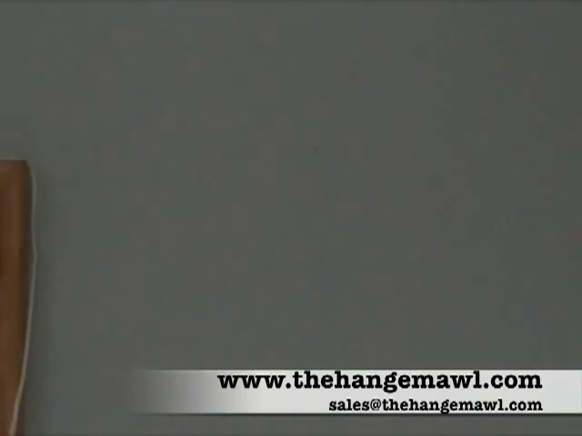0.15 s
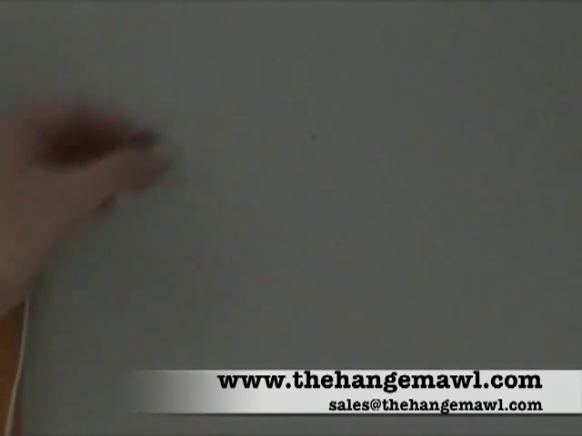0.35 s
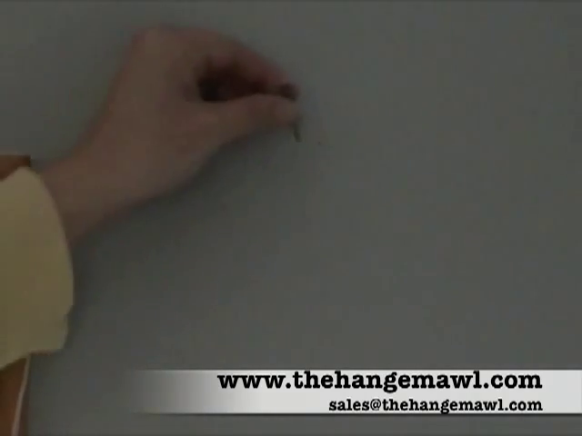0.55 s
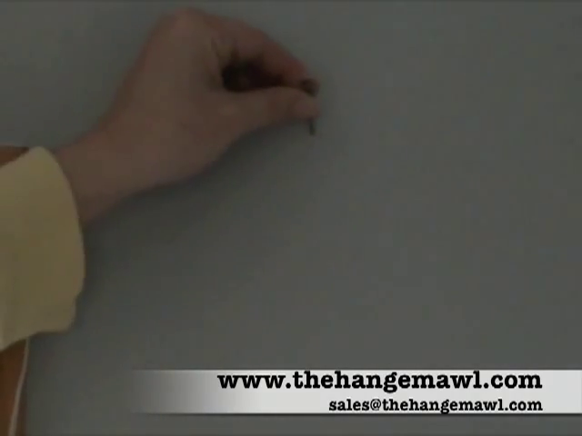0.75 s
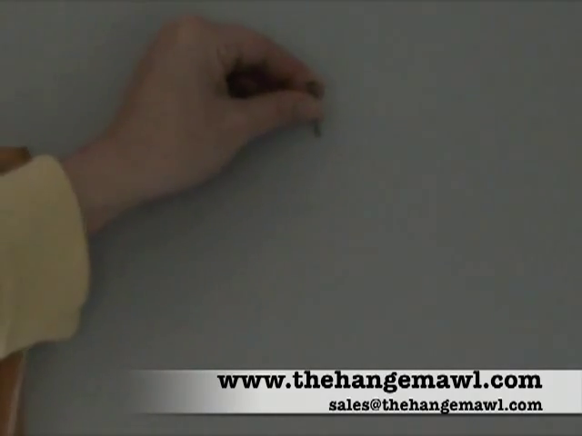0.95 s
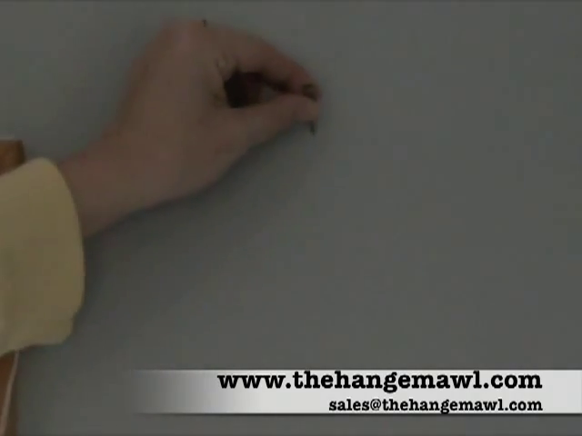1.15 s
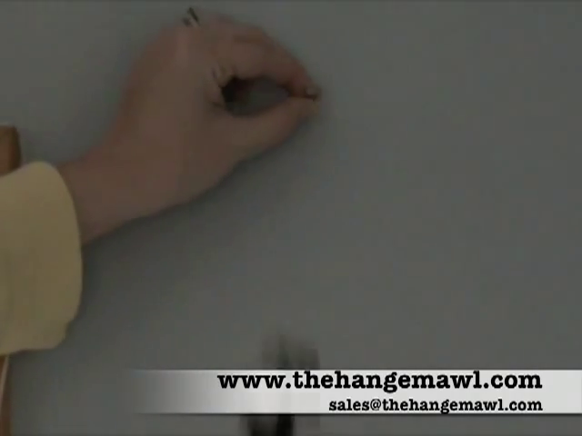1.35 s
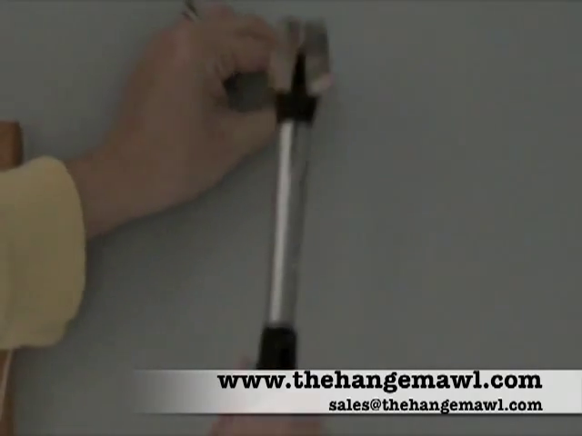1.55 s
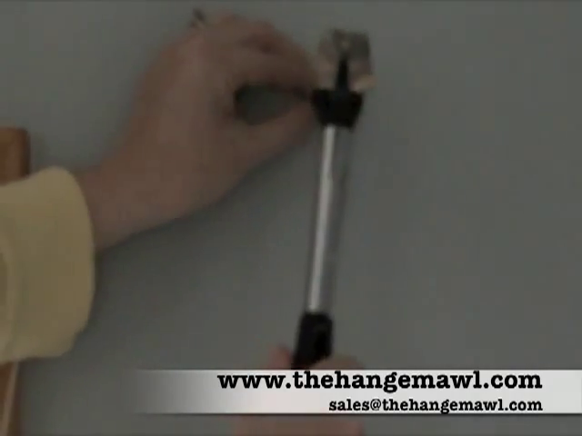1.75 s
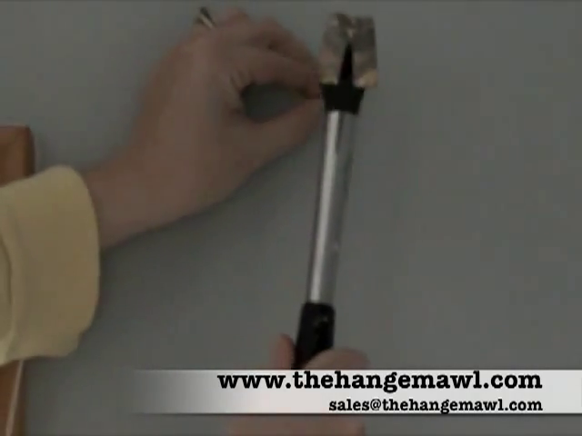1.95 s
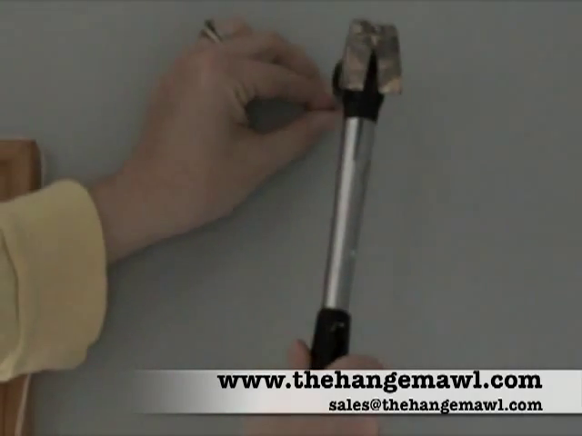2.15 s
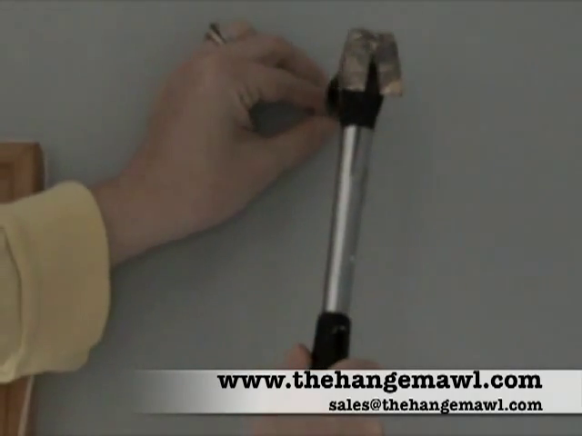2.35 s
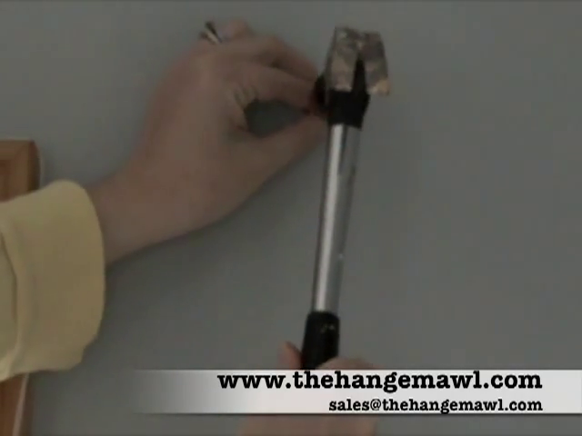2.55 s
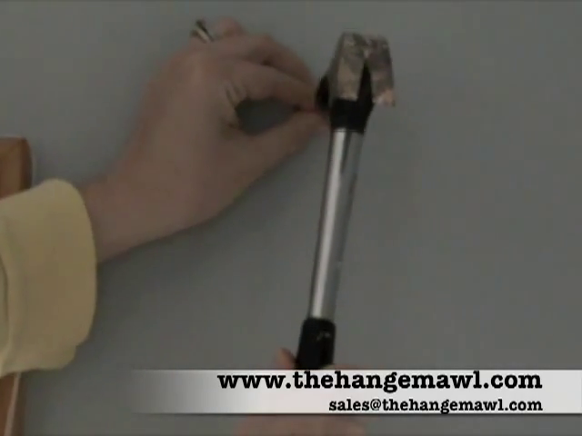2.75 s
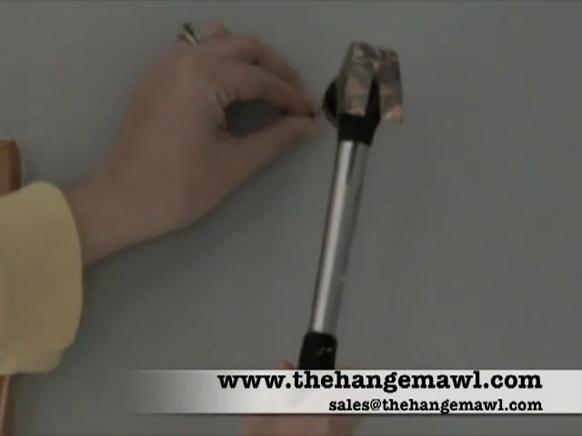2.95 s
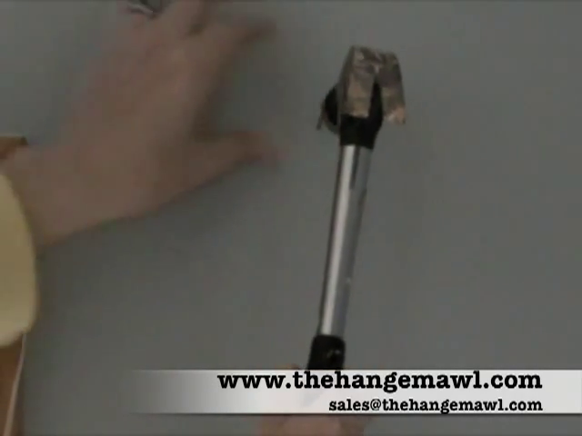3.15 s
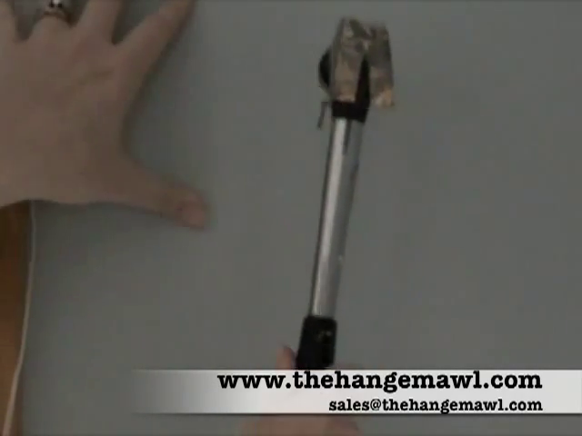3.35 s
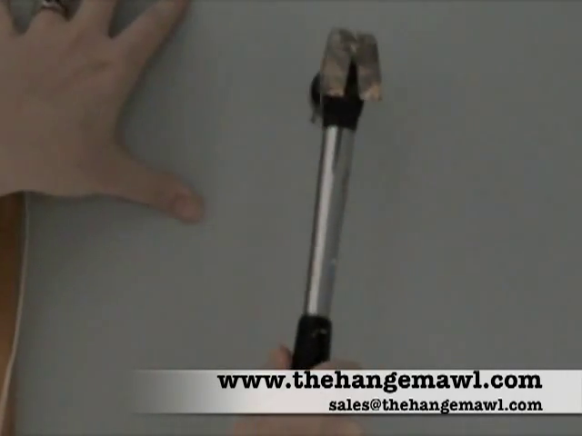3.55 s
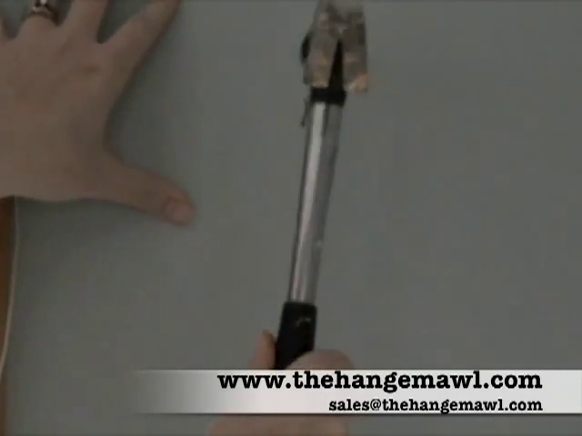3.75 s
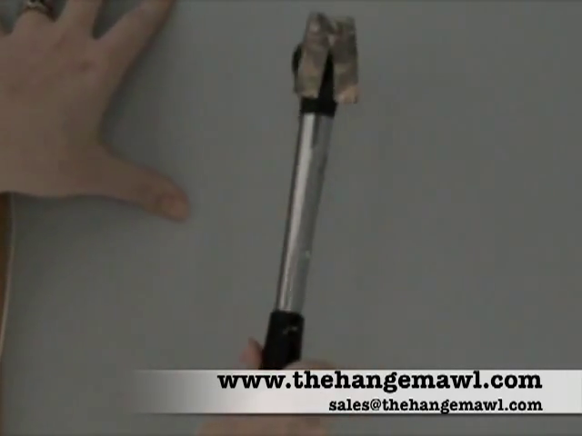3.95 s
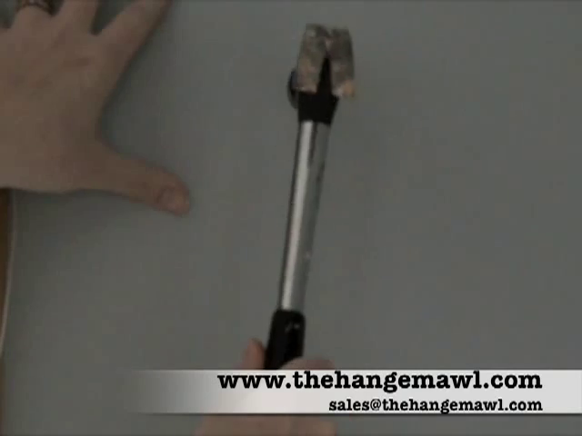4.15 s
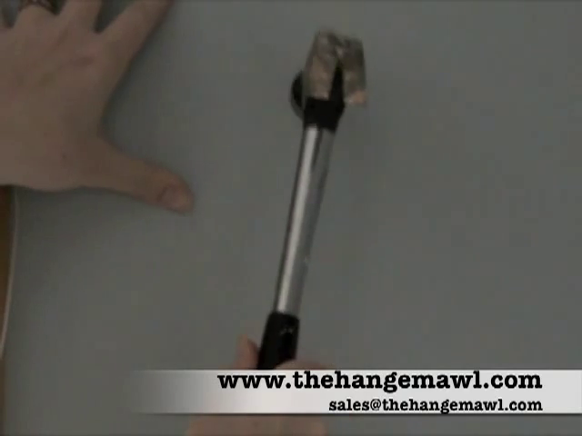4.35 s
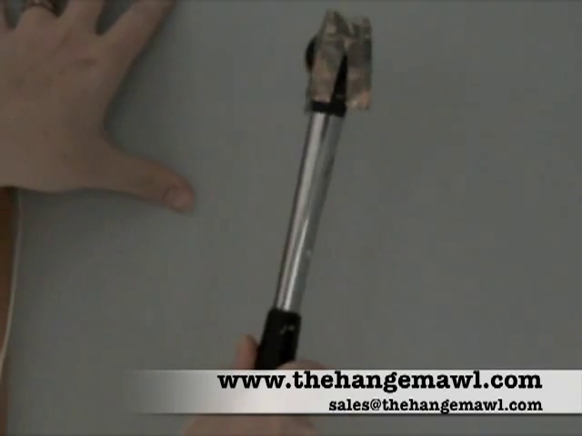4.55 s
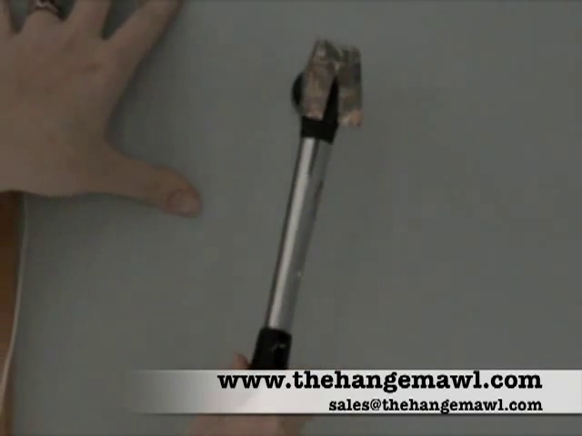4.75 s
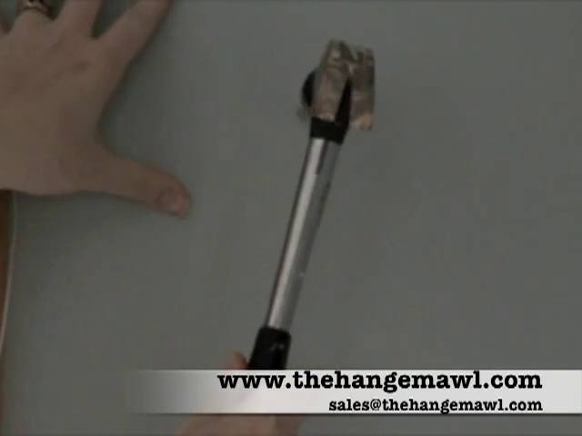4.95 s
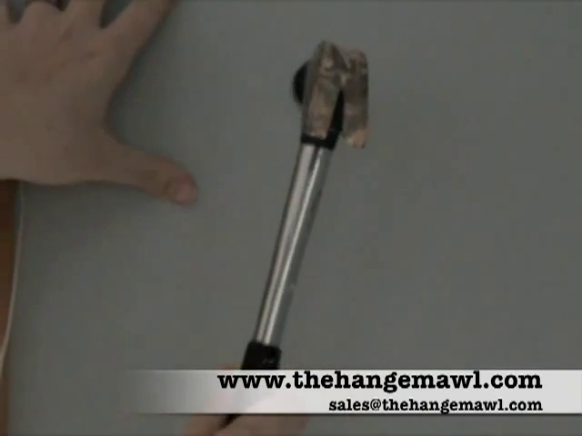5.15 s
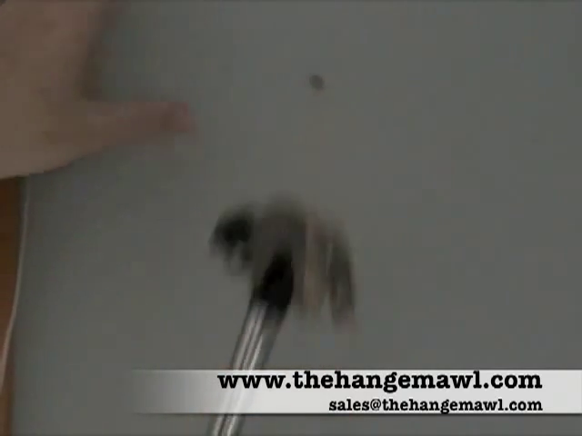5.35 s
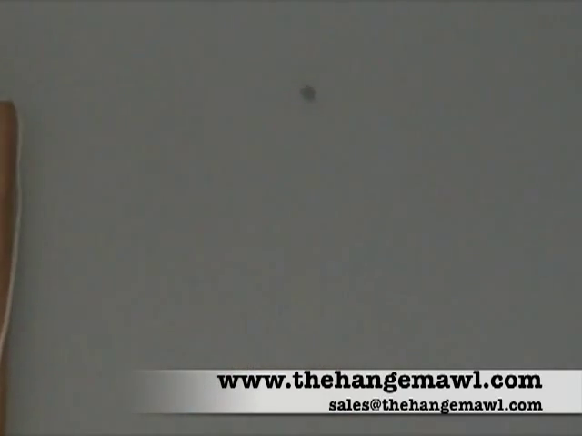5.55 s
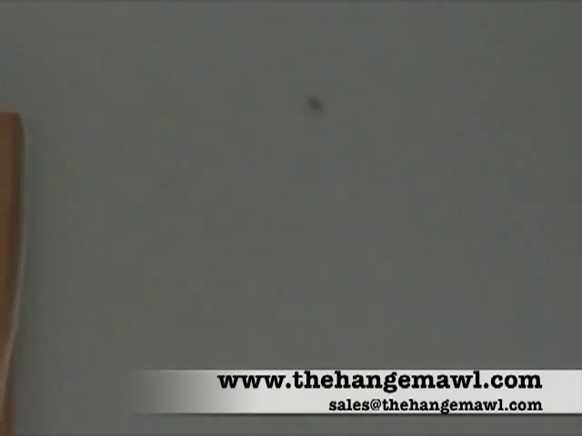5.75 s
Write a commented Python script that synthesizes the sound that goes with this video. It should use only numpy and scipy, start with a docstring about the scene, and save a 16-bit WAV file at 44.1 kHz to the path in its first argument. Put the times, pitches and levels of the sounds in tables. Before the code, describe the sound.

A hammer taps a nail once, then drives it into a hollow wall in two quick runs of blows in a bare room.

```python
"""Hammering a nail into a hollow wall

A nail is set with one tap, then hammered into a plasterboard wall in two runs of blows, close to a camera.
Filtered clicks, noise bursts and decaying tones make each blow; its thud weakens and its crack brightens.
A bare room answers with fading noise, and gain control clamps on loud cracks, so the room swells up behind.
Handling knocks (short resonances) and a sleeve's rustle (shaped noise) come before and after,
with a faint squeak (falling tone) near the end, all over steady hiss and a whine of narrow noise bands."""
import sys
import numpy as np
from scipy import signal
from scipy.fft import rfft, irfft
from scipy.io import wavfile
from scipy.ndimage import uniform_filter1d, minimum_filter1d

SR = 44100
rng = np.random.default_rng(int(sys.argv[2]) if len(sys.argv) > 2 else 0)


def to_wav(sig):
    """Store sig (one row per channel, or 1-D mono) as 16-bit WAV at the path in sys.argv[1].

    Samples outside -1..1 are clipped; the rate is SR.
    """
    pcm = np.clip(np.atleast_2d(sig), -1, 1) * 32767
    pcm = np.round(pcm).astype(np.int16)
    wavfile.write(sys.argv[1], SR, pcm.T)  # frames by channels


N = 255339
TIME = np.arange(N) / SR  # seconds
RING = 2 ** 15  # longest length of one short sound, in samples
AGE = np.arange(RING) / SR  # seconds since a short sound began
RING_HZ = np.fft.rfftfreq(RING, 1 / SR)

# How wide the room sounds. Each row: frequency in Hz, side level over middle level in dB.
ROOM_WIDTH = [(60, -8.5), (200, -5), (380, 2), (700, -5.5), (1300, -4.5), (2400, -10), (4400, -13),
              (8000, -23), (15000, -10)]
# How wide the still room's hiss and whine sound. Each row: frequency in Hz, side level over middle in dB.
HUSH_WIDTH = [(60, -29), (240, -17), (950, 0.5), (3770, 1.5), (15000, -10.5)]


def amp(db):
    """Turns decibels into gain."""
    return 10 ** (np.asarray(db) / 20)


def unit(x):
    """Scales a sound to an energy of one a channel, averaged over the channels."""
    energy = np.mean(np.sum(x ** 2, -1))
    return x / np.sqrt(energy + 1e-30)


def read(points, hz):
    """Reads a curve that joins (Hz, value) points on a log-frequency axis."""
    f, value = np.transpose(points)
    return np.interp(np.log(hz + 1), np.log(f + 1), value)


def add(mix, s, sound):
    """Mixes a short stereo sound in at s seconds."""
    start = max(round(s * SR), 0)
    part = mix[:, start:][:, :RING]
    part += sound[:, :part.shape[1]]


def colour(x, db):
    """Filters with the dB gains given at RING_HZ; nothing sounds before its cause (minimum phase)."""
    log_gain = np.log(amp(np.r_[db, db[-2:0:-1]]))
    response = np.exp(np.conj(signal.hilbert(log_gain)))[:len(db)]
    impulse = irfft(response)[None, :RING // 4]
    return signal.fftconvolve(np.atleast_2d(x), impulse, axes=1)[:, :RING]


def stereo_noise(size, width):
    """Makes two channels of white noise, as alike as the side level allows."""
    side = amp(read(width, np.fft.rfftfreq(size, 1 / SR)))
    m, s = rfft(rng.standard_normal((2, size)))
    left_right = np.array([m + side * s, m - side * s])
    return irfft(left_right / np.hypot(1, side), size)


def shaken(t60):
    """A burst of dense vibration that falls 60 dB in t60 seconds."""
    return unit(stereo_noise(RING, ROOM_WIDTH) * amp(-60 * AGE / t60))


def hiss(spectrum, width):
    """Steady coloured stereo noise with an rms of one."""
    gain = amp(read(spectrum, np.fft.rfftfreq(N, 1 / SR)))
    noise = irfft(rfft(stereo_noise(N, width)) * gain, N)
    return unit(noise) * np.sqrt(N)


def hum(width_hz=9):
    """A faint whine of wavering tones, each a very narrow band of noise."""
    # Each row: pitch in Hz, level in dB.
    whine = [(268, -68), (835, -68), (3300, -75.5), (5800, -79)]
    hz = np.fft.rfftfreq(N, 1 / SR)
    lines = 0
    for pitch, db in whine:
        lines = lines + amp(db) * unit(1 / (1 + ((hz - pitch) / width_hz) ** 2))
    return irfft(rfft(stereo_noise(N, HUSH_WIDTH)) * lines, N) * np.sqrt(len(hz))


def room_tail(start_s=0.0044, build_s=0.015, count=26):
    """Dense echoes of the room: noise that builds up briefly, each band dying away at its own speed."""
    # How long echoes last. Each row: frequency in Hz, time to fall 60 dB in seconds.
    echo_life = [(40, 1), (100, 0.35), (300, 0.39), (1000, 0.48), (3000, 0.47), (7000, .37), (14000, 0.27)]
    noise = rfft(stereo_noise(RING, ROOM_WIDTH))
    centres = np.geomspace(40, 16000, count)
    onset = np.clip((AGE - start_s) / build_s, 0, 1)
    tail = 0
    for hz, pick in zip(centres, np.eye(count)):
        band = np.sqrt(read(np.c_[centres, pick], RING_HZ))
        fade = onset * amp(-60 * AGE / read(echo_life, hz))
        # each band keeps its share of the energy, however fast it fades
        tail = tail + unit(irfft(noise * band) * fade) * np.linalg.norm(band)
    return unit(tail)


def sleeve(grain_db=1.4, pivot_hz=2000, swish_t60=0.79):
    """Each arm move is a noise swish that swells and dies; the cloth slides in small uneven catches."""
    # Each row: start in seconds, rise in seconds, swell's top level in dB, brightness in dB per octave.
    swishes = [(0, 0.0085, -51, -1), (.045, 0.0092, -50, 1.3), (.28, 0.061, -51, 0.6),
               (.45, .035, -52.5, 0.7), (.905, 0.0093, -56.5, -2.5), (1.09, 0.053, -60.5, -0.5),
               (5.53, 0.039, -52.5, 0.5), (5.64, .03, -58, 1)]
    # Basic tone of the cloth. Each row: frequency in Hz, relative level in dB per Hz.
    cloth_tone = [(100, 3), (500, -3.5), (1400, -1.5), (3000, -7), (8000, -12.5), (12000, -26),
                  (16000, -27)]
    out = np.zeros((2, N))
    octaves = np.log2(np.maximum(RING_HZ, 100) / pivot_hz)
    for s, rise, db, bright in swishes:
        tone = amp(read(cloth_tone, RING_HZ) + bright * octaves)
        cloth = irfft(rfft(stereo_noise(RING, ROOM_WIDTH)) * tone)
        fade = amp(db - 60 * np.maximum(AGE - rise, 0) / swish_t60)
        swell = np.minimum(AGE / rise, 1) * fade
        add(out, s, unit(cloth) * np.sqrt(RING) * swell)
    catches = unit(uniform_filter1d(rng.standard_normal(N), size=300)) * np.sqrt(N)
    return out * amp(grain_db * catches)


def squeak(tail, start_hz=560, sag_hz_per_s=730, rise_s=0.005, slip_t60=0.15, room_db=-6):
    """A faint squeak in two slips as the hands draw back; its pitch falls as the hand slows."""
    # Each row: start in seconds, level in dB that the slip dies away from.
    slips = [(5.531, -40.5), (5.579, -45.5)]
    level = 0
    for s, db in slips:
        rise = np.clip((TIME - s) / rise_s, 0, 1)
        level = level + rise * amp(db - 60 * abs(TIME - s) / slip_t60)
    hz = start_hz - sag_hz_per_s * (TIME - slips[0][0])
    tone = level * np.sin(2 * np.pi * np.cumsum(hz) / SR)
    return tone + amp(room_db) * signal.fftconvolve(tone[None], tail, axes=1)[:, :N]


def bump(tail, hz, width_hz, room_db, rattle_db=7, rattle_t60=0.044):
    """A click and a rattle through one broad resonance, dulled by soft contact, with the room's answer."""
    detune = (RING_HZ ** 2 - hz ** 2) / ((RING_HZ + 1) * width_hz)
    dulling = 1 + (RING_HZ / (hz + width_hz)) ** 4
    shape = -10 * np.log10((1 + detune ** 2) * dulling)
    shape = np.maximum(shape, -100)
    push = signal.unit_impulse(RING) + amp(rattle_db) * shaken(rattle_t60)
    direct = unit(colour(push, shape))
    return direct + amp(room_db) * unit(colour(tail, shape))


def knocks(tail, contact_room_db=-1, hollow_room_db=1.5, thump_room_db=-4):
    """Soft bumps on wall and furniture: contact and hollow knock first, then the wall's slow, low flex."""
    # Each row: start in seconds, contact level in dB, contact pitch in Hz, width of its resonance in Hz,
    # hollow knock level in dB, wall thump level in dB.
    bumps = [(0.0475, -33.5, 700, 1370, -32.5, -20), (.070, -32, 520, 220, -40, -40),
             (.128, -29, 690, 460, -27, -45), (.460, -58, 350, 250, -44, -36),
             (.536, -44.5, 720, 650, -48, -39), (.687, -40.5, 574, 110.3, -58, -62),
             (5.498, -49.5, 620, 400, -64, -65), (5.738, -52, 870, 800, -62, -60),
             (5.771, -49, 900, 800, -58, -60)]
    hollow_hz, hollow_width_hz = 293, 355  # the cavity's dull knock
    thump_hz, thump_width_hz, thump_lag_s = 60, 30, 0.0035
    out = np.zeros((2, N))
    for s, db, hz, width_hz, hollow_db, thump_db in bumps:
        add(out, s, amp(db) * bump(tail, hz, width_hz, contact_room_db))
        add(out, s, amp(hollow_db) * bump(tail, hollow_hz, hollow_width_hz, hollow_room_db))
        add(out, s + thump_lag_s, amp(thump_db) * bump(tail, thump_hz, thump_width_hz, thump_room_db))
    return out


def low_modes(build_s=0.004):
    """Standing waves in cavity and room: they build up, and reach the two microphones out of step."""
    # Each row: pitch in Hz, relative level in dB, time to fall 60 dB in seconds.
    standing_waves = [(36.6, -17, 1.13), (78.4, -2, 0.31), (135.3, -11, 0.25), (209.3, -2.5, 0.39),
                      (224, -6, 0.21), (262.5, -12, 0.6), (313.7, -4, 0.39), (420.4, -6, 0.37),
                      (483, -6.5, 0.41), (530, -6, 0.38), (688, -29.5, 0.13), (770, -30, 0.13),
                      (1670, -15, 0.52)]
    ring = 0
    for hz, db, t60 in standing_waves:
        first, gap = rng.random(2)
        cycles = hz * AGE + first + np.array([[0], [gap / 3]])
        ring = ring + amp(db - 60 * AGE / t60) * np.sin(2 * np.pi * cycles)
    return unit(ring * (1 - np.exp(-AGE / build_s)))


def wall_strike(bend_lag_s=0.00109, left_lag_s=0.0027, crunch_db=4, crunch_t60=0.0081,
                shiver_db=-5, shiver_t60=0.18, ring_db=0, contact_s=0.0001):
    """Bending waves bring the treble first and the bass late; plaster crunches, board and nail ring briefly."""
    # Tone of the wall's direct sound. Each row: frequency in Hz, relative level in dB per Hz.
    board_tone = [(25, -30), (65, -0.5), (125, 8), (250, 0.5), (370, -8), (510, -2.5), (780, -11.5),
                  (1400, -10.5), (1850, -12), (2700, -15), (4200, -18.5), (5700, -26.5), (8500, -24.5),
                  (11000, -38), (16000, -55)]
    # What the struck spot rings with, from the board's flex up to the nail.
    # Each row: pitch in Hz, relative level in dB, time to fall 60 dB in seconds.
    struck_spot = [(68, -25, 0.037), (144.7, 4.5, 0.082), (463, 0, 0.013), (1133, -13.5, 0.032),
                   (2030, -6, .022), (3385, -7, 0.03), (4280, -5.5, 0.02), (8340, -14.5, 0.012)]
    delay = bend_lag_s / np.sqrt(np.maximum(RING_HZ, 60) / 1000)  # bend_lag_s is the delay at 1 kHz
    turns = np.cumsum(delay) * SR / RING  # summing the delay over frequency gives the phase
    front = -irfft(np.exp(-2j * np.pi * turns)) * (AGE < .5)
    plaster = amp(crunch_db) * shaken(crunch_t60) + amp(shiver_db) * shaken(shiver_t60)
    plaster = colour(plaster, read([(120, -1), (400, 7.0)], RING_HZ))
    ring = 0
    for hz, db, t60 in struck_spot:
        # only the bass, which leaves the whole board, reaches the left microphone late
        lag = np.array([[left_lag_s], [0]]) / (1 + (hz / 300) ** 2)
        age = np.maximum(AGE - lag, 0)
        push = 1 - np.exp(-age / contact_s)  # the hammer face takes a moment to load the nail
        ring = ring - push * amp(db - 60 * age / t60) * np.sin(2 * np.pi * hz * age)
    wall = unit(colour(front + plaster, read(board_tone, RING_HZ)))
    return unit(wall + amp(ring_db) * unit(ring))


def hammer(tail, room_db=-5, modes_db=-11.5, shift_rad=1.365, far_thud=0.84):
    """Every blow wakes the same wall and room; the echo pattern shifts slowly as the nail sinks."""
    # Each row: start in seconds, force in dB, then tone changes in dB for the board's thud,
    # the cavity's knock, the crack and the nail's tick.
    blows = [(2.0937, -13, 11, 2, -8.5, 2.5), (2.3658, 7.5, -0.5, 0.5, -10, -5.5),
             (2.6169, 8.5, -3, -3, -8.5, -9.5), (2.861, 10, -3.5, -4, -9, -8.5),
             (3.606, 9.5, 1, -2, -2, -4.5), (3.9009, 10, -3.5, -2.5, -1.5, -2.5),
             (4.1742, 6.5, -2, -1, 0, 0.5), (4.4481, 4, -4, 1.5, 0, 1), (4.7251, -1.5, -6, -0.5, 0.5, 2.5)]
    # First reflections. Each row: delay in seconds, level in dB.
    echoes = [(.0095, -11), (0.0161, -12), (0.0238, -32), (0.0265, -21), (.033, -18)]
    # What small nearby surfaces throw back. Each row: frequency in Hz, gain in dB.
    bounce_tone = [(120, -3), (500, -3), (9000, -5.5), (16000, 11)]
    # Tone of the room's answer. Each row: frequency in Hz, relative level in dB per Hz.
    room_tone = [(22, -32), (55, -7), (90, -2.5), (165, -0.5), (280, 2), (390, -6), (720, -7),
                 (1200, -13.5), (1600, -11), (3100, -13), (5500, -21), (8700, -30), (11500, -40),
                 (16000, -61)]
    direct = wall_strike()
    bounce = colour(direct, read(bounce_tone, RING_HZ))
    for delay, db in echoes:
        add(direct, delay, amp(db) * bounce)
    shallow = unit(colour(tail, read(room_tone, RING_HZ)))
    deep = unit(colour(room_tail(), read(room_tone, RING_HZ)))
    modes = amp(modes_db) * low_modes()
    out = np.zeros((2, N))
    depths = np.sqrt(np.linspace(0, 1, len(blows)))  # 0 at the first blow, 1 at the last
    for depth, row in zip(depths, blows):
        s, force_db, thud_db, knock_db, crack_db, tick_db = row
        turn = shift_rad * depth
        echo = np.cos(turn) * shallow + np.sin(turn) * deep
        room = modes + amp(room_db) * unit(echo)
        # the board's flexing is heard mostly close by: the room gets only a share of its change
        for sound, bass_db in (direct, thud_db), (room, far_thud * thud_db):
            tone = [(150, bass_db), (380, knock_db), (1000, 0.024),
                    (3200, crack_db), (5000, crack_db), (8500, tick_db)]
            add(out, s, colour(sound, force_db + read(tone, RING_HZ)))
    return out


def scene():
    """Blows, knocks and squeak share one room; the bass of the hits leans to the right."""
    # Left over right in the hits. Each row: frequency in Hz, level difference in dB.
    balance = [(60, -2.5), (380, -2), (700, -0.3), (8000, -0.5)]
    # Still room and microphone hiss. Each row: frequency in Hz, relative level in dB per Hz.
    hush_tone = [(12, -29), (20, 3), (222, -7.5), (270, -4.5), (780, -17), (849, -15), (1860, -20),
                 (3250, -23), (3840, -25.5), (7520, -31.5), (16000, -35.5)]
    hush_db = -51
    tail = room_tail()
    hits = hammer(tail) + knocks(tail)
    hits = hits * np.sqrt(SR / 100)  # unit energy becomes an rms of one over 10 ms
    lean_db = read(balance, np.fft.rfftfreq(N, 1 / SR)) * np.array([[.5], [-.5]])
    hits = irfft(rfft(hits) * amp(lean_db), N)
    return hits + sleeve() + squeak(tail) + hum() + amp(hush_db) * hiss(hush_tone, HUSH_WIDTH)


def held(over_db, recovery):
    """Jumps up with its input and sinks back at recovery dB a second."""
    fall = recovery * TIME
    return np.maximum.accumulate(over_db + fall) - fall


def record(dry, limit_db=-11, fast_recovery=250, slow_share=0.23, slow_recovery=1.77,
           low_cut_hz=18, sense_hz=110, edge_hz=16100):
    """Low cut, gain control with a fast and a slow release (dB a second), soft overload, then treble limit."""
    low_cut = signal.butter(2, low_cut_hz, "highpass", fs=SR, output="sos")
    dry = signal.sosfilt(low_cut, dry)
    sense = signal.butter(1, sense_hz, "highpass", fs=SR, output="sos")  # bass counts less
    sensed = signal.sosfilt(sense, dry)
    power = abs(uniform_filter1d((sensed ** 2).mean(0), size=64))
    over_db = np.maximum(10 * np.log10(power + 1e-12) - limit_db, 0)
    fast_db = held(over_db, fast_recovery)
    slow_db = held(slow_share * over_db, slow_recovery)
    duck_db = np.maximum(fast_db, slow_db)
    # hold the deepest cut for 32 samples, then smooth it
    duck_db = uniform_filter1d(-minimum_filter1d(-duck_db, size=32), size=32)
    overloaded = np.tanh(dry * amp(-duck_db))
    edge = signal.firwin(511, edge_hz, window=("kaiser", 9), fs=SR)
    return signal.oaconvolve(overloaded, edge[None], "same")


dry = scene()
out = record(dry)
to_wav(out)
```